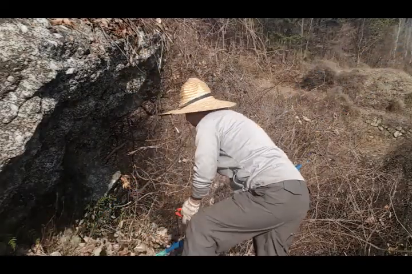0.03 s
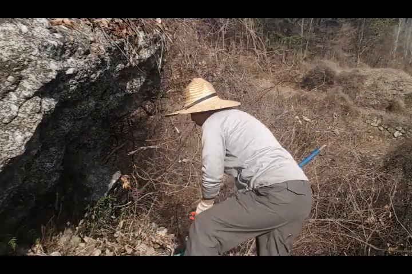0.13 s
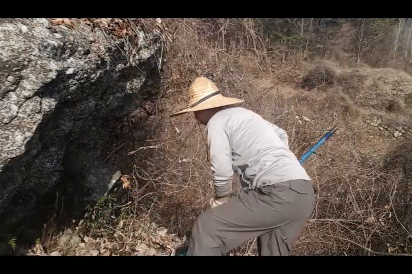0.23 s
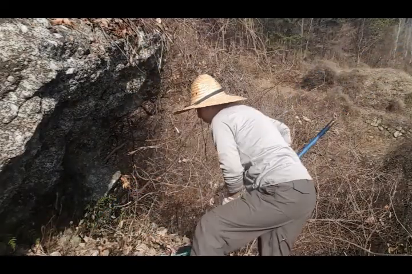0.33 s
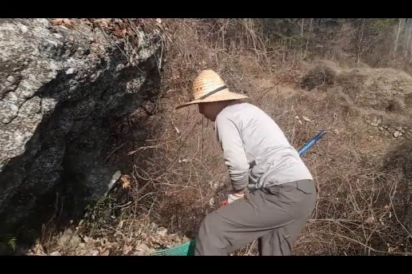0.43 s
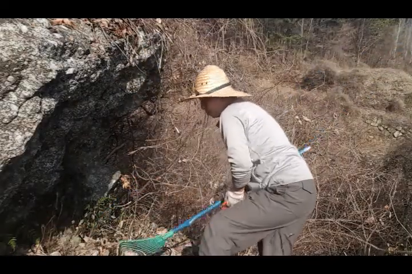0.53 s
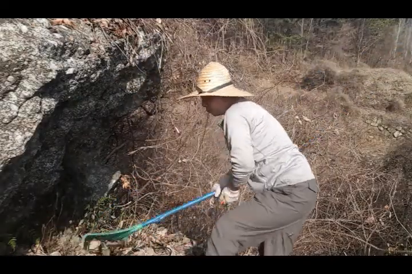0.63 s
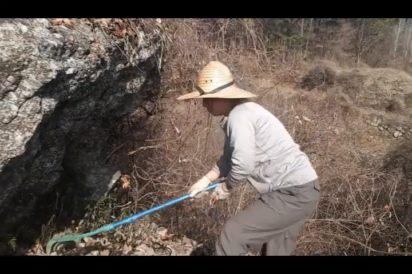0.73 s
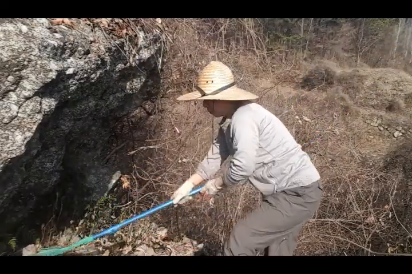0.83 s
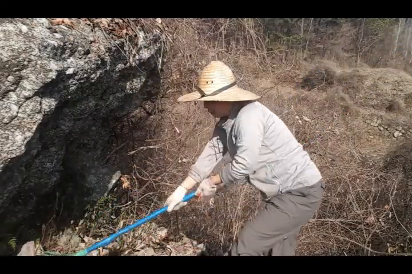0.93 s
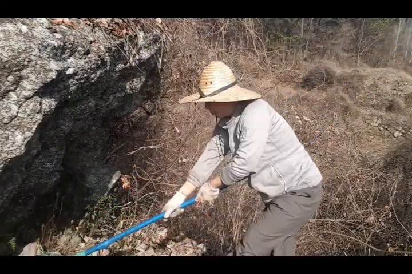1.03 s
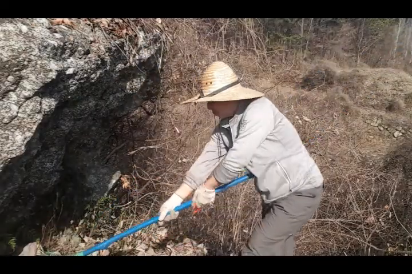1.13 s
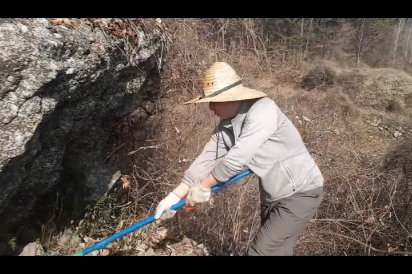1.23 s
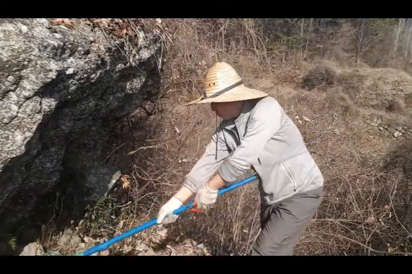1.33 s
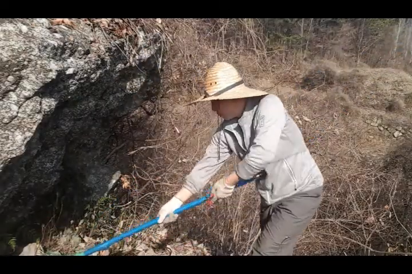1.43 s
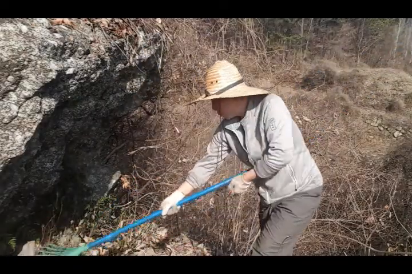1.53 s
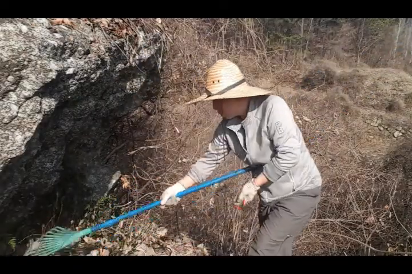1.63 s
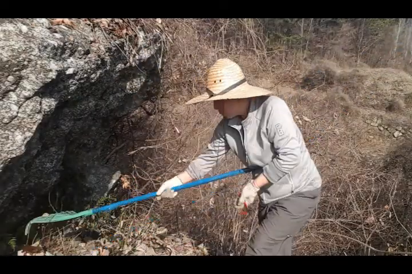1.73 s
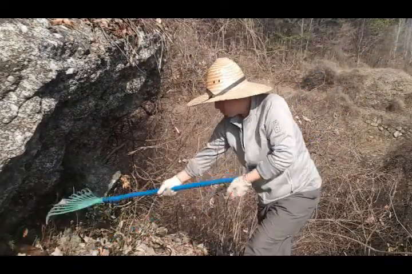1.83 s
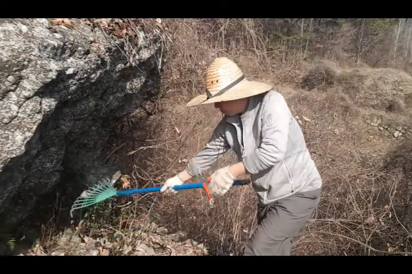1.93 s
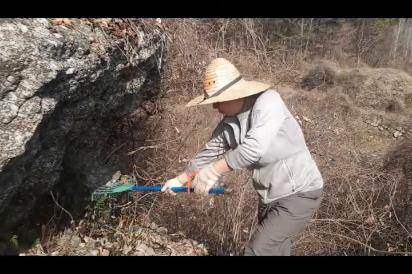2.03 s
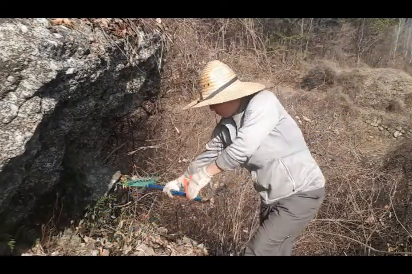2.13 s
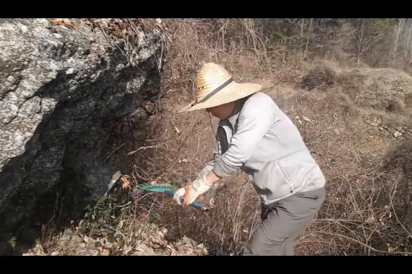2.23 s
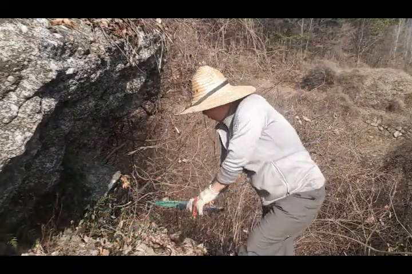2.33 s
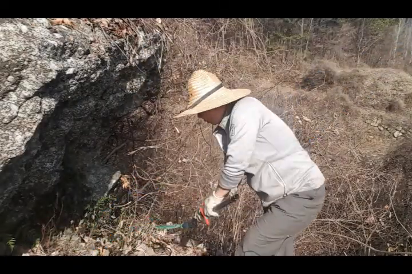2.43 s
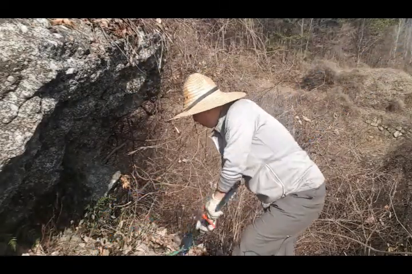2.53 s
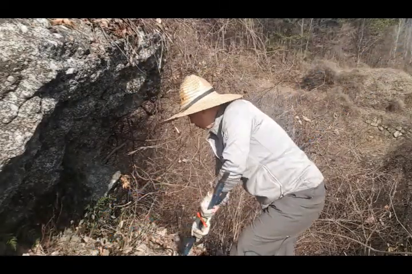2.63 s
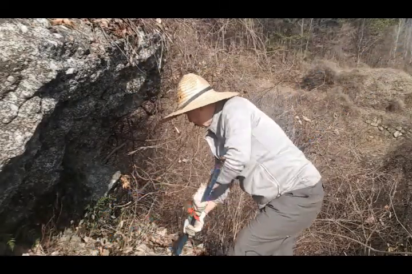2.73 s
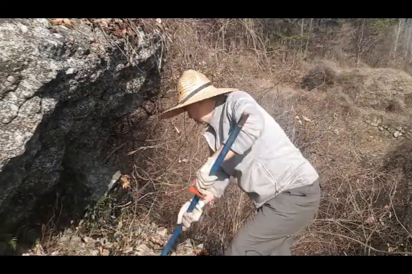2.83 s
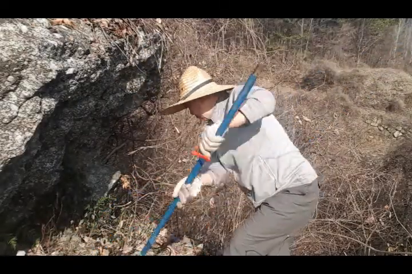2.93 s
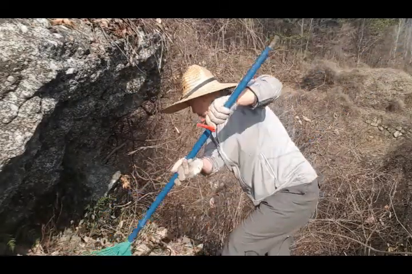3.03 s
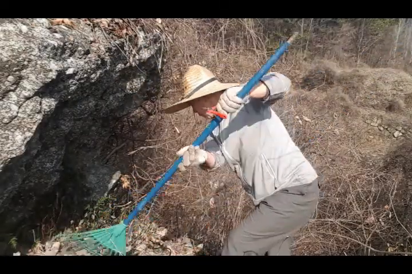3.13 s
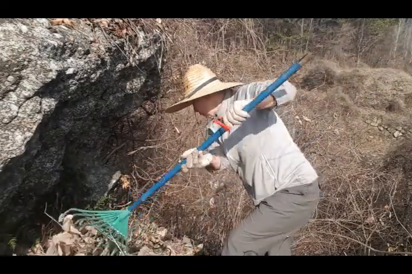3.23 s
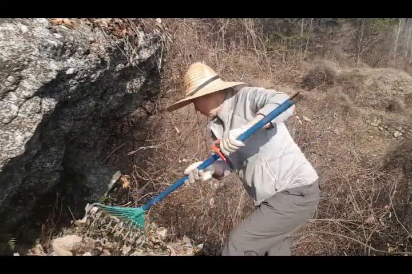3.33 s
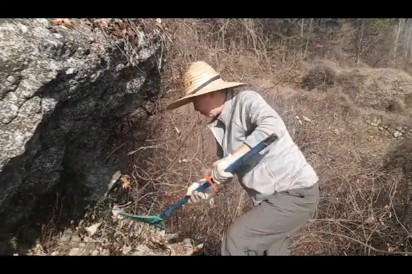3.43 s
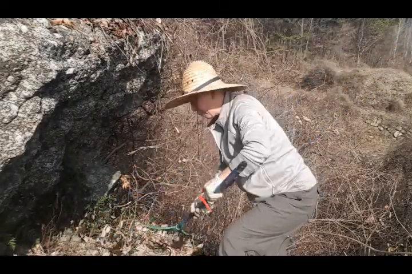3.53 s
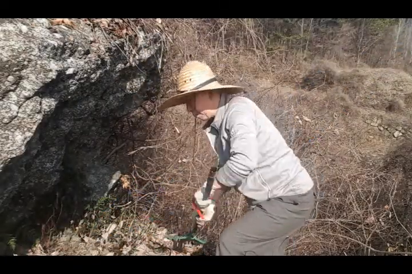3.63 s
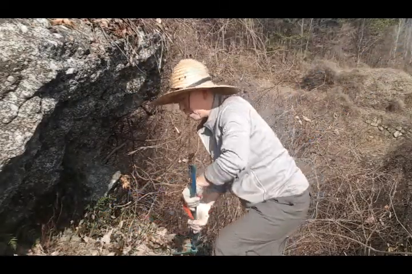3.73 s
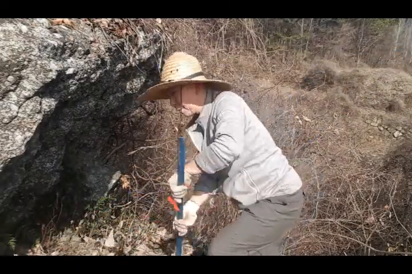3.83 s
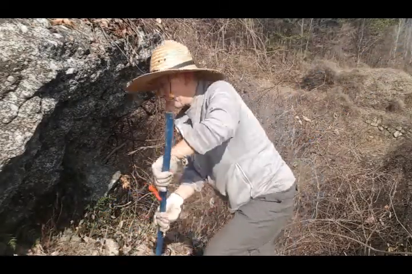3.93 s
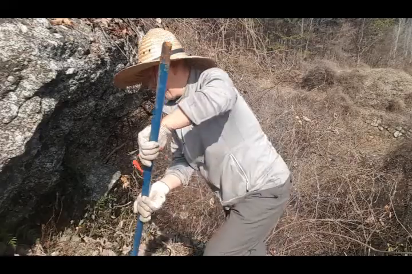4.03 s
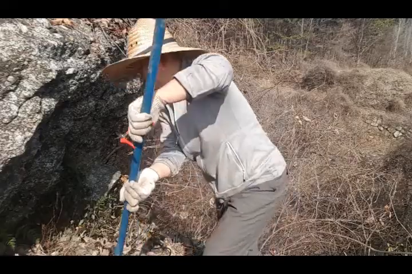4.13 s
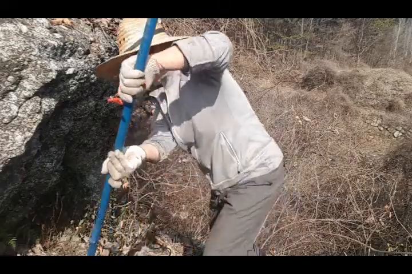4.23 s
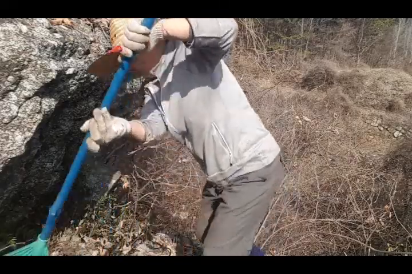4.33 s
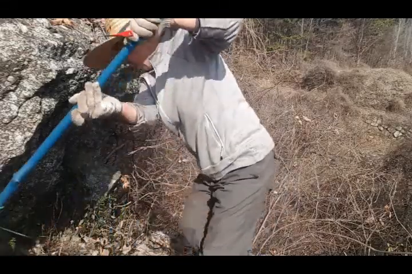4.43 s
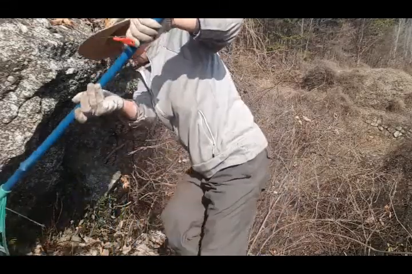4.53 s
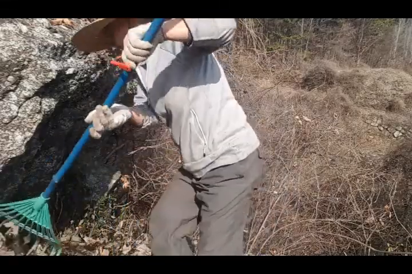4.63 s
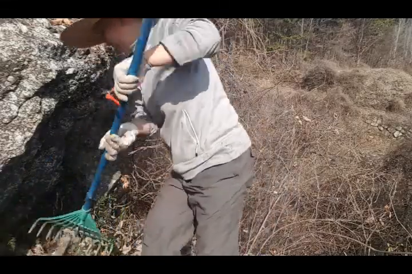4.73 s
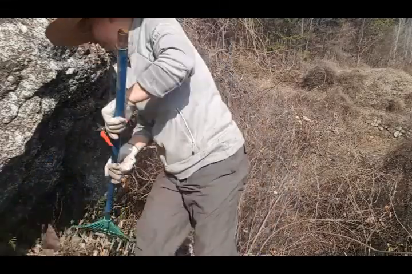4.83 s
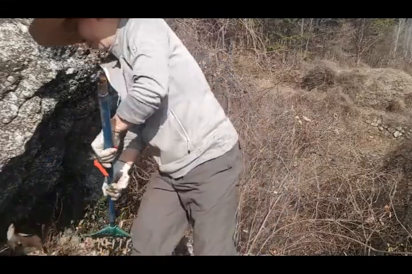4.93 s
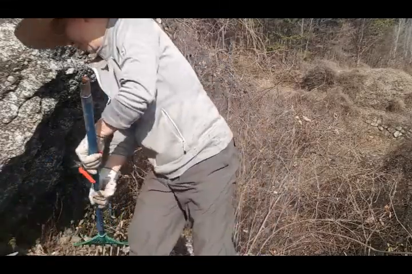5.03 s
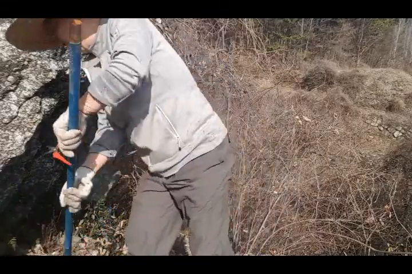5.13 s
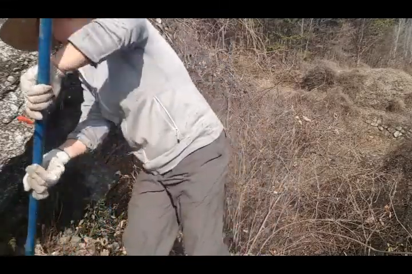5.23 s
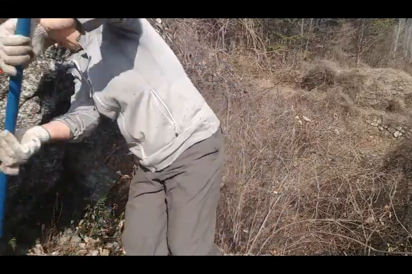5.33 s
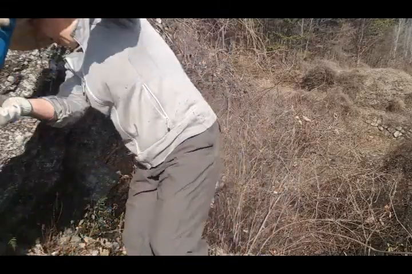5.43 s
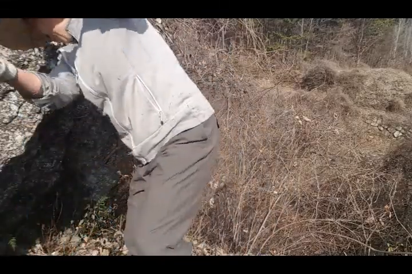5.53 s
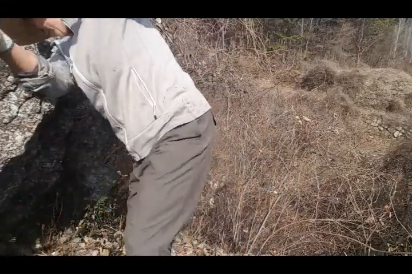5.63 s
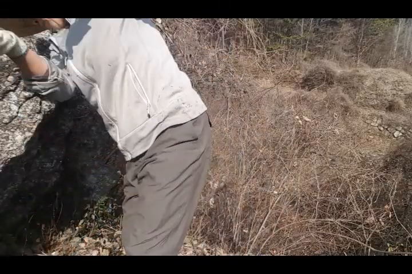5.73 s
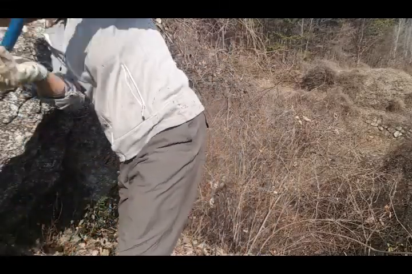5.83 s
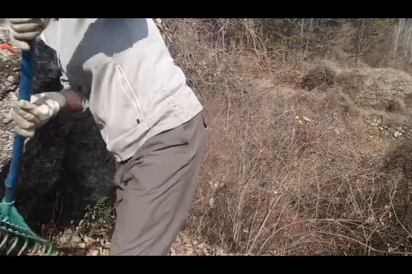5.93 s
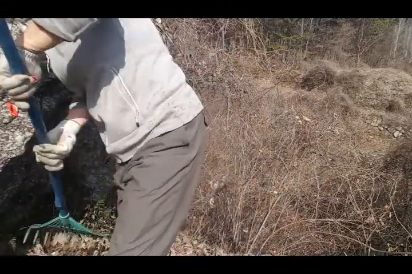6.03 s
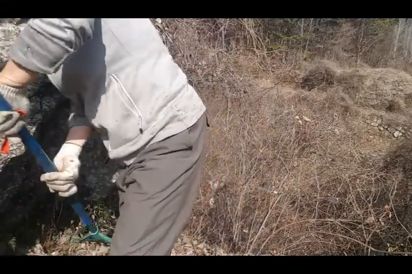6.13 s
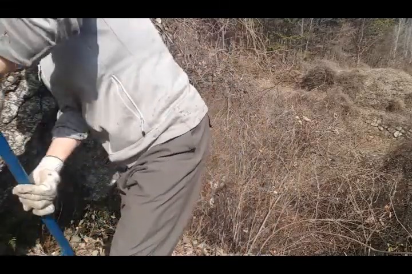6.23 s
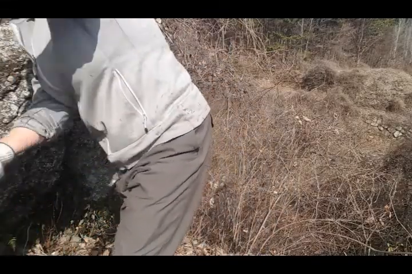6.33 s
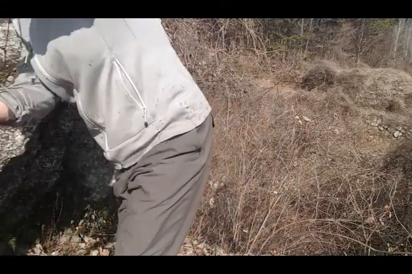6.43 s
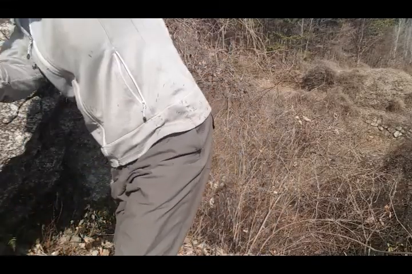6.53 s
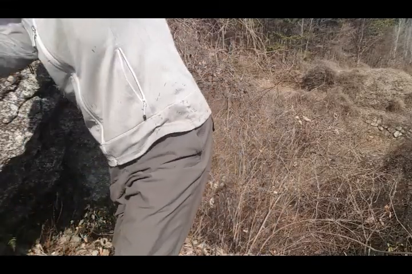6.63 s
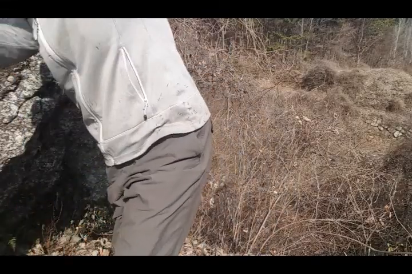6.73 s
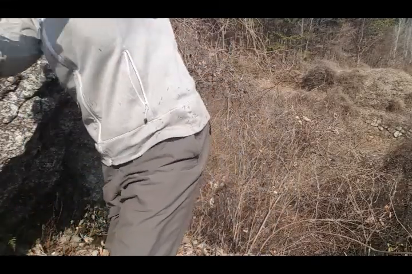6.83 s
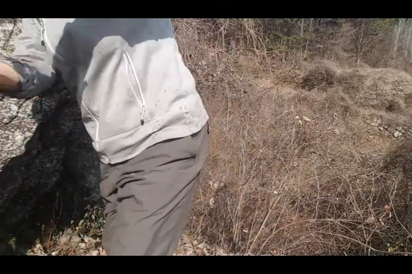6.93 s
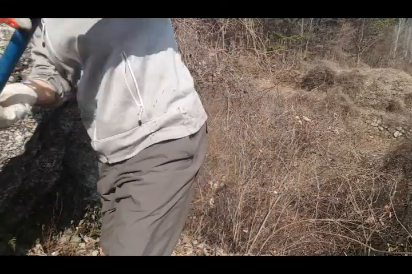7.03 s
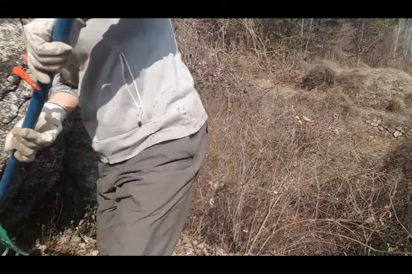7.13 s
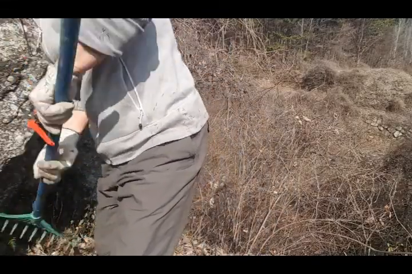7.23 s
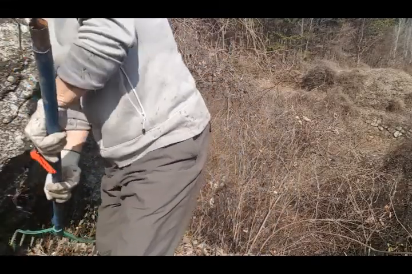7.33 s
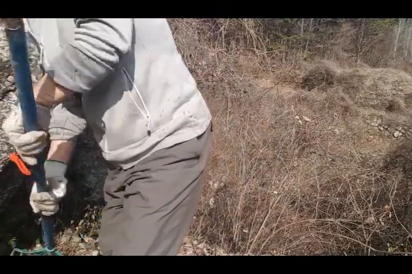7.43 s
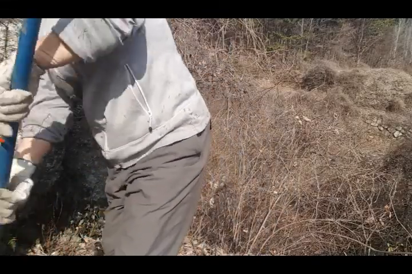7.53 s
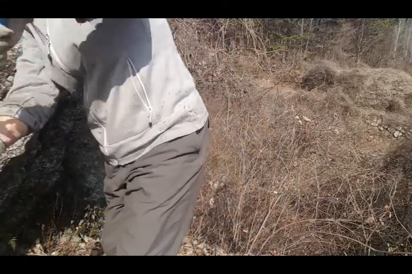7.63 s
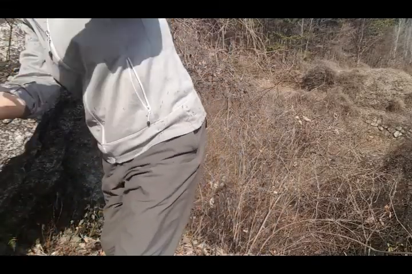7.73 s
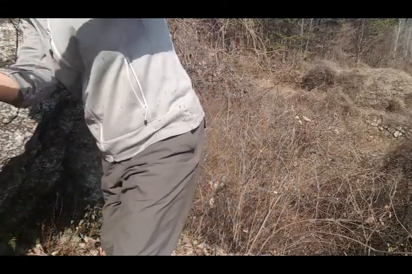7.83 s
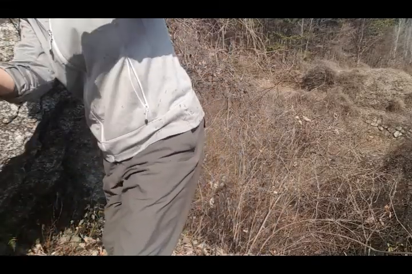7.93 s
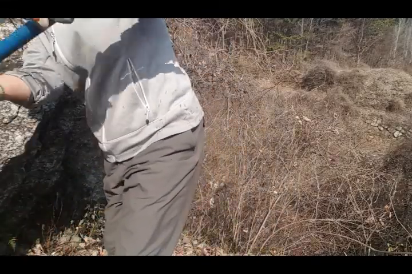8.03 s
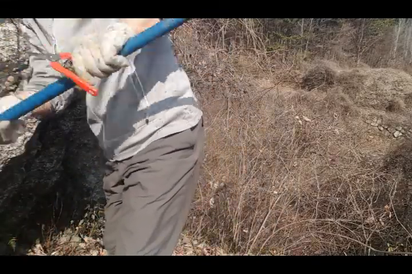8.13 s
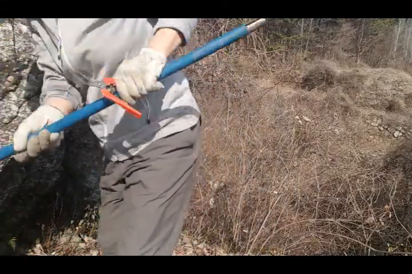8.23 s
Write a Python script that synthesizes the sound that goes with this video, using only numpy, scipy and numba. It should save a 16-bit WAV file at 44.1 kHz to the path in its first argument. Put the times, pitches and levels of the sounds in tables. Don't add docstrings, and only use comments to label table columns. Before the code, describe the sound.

Outdoors at the foot of a rock, a plastic rake pulls through dry leaves and brambles a couple of metres off, toward the right. Early strokes are light and irregular with small ticks; from about three seconds the pulls grow heavier, scraping soil, snapping twigs and knocking roots. One very sharp snap comes past five seconds. Brief near-quiet gaps show soft air. Close stereo microphone, dry, with slight rock scatter.

```python
import sys
import numpy as np
from scipy import signal
from scipy.fft import rfft, irfft
from scipy.io import wavfile
from scipy.ndimage import uniform_filter1d, map_coordinates
from numba import njit

SR = 44100
rng = np.random.default_rng(int(sys.argv[2]) if len(sys.argv) > 2 else 0)


def magnitude_from_level(level_db):
    exponent = np.asarray(level_db, float) / 20
    return 10 ** exponent


def transcribe(signal):
    frames = np.atleast_2d(signal).T
    limited = np.clip(frames, -1, 1)
    pcm = np.round(limited * 32767).astype(np.int16)
    wavfile.write(sys.argv[1], SR, pcm)


N = 365588

# frequency in Hz, density in dB per Hz.
AIR_SPECTRUM = [(18, 10), (35, -21), (60, 0), (130, 4), (400, -1.5), (1500, -2), (4000, -12.5), (9500, -32),
                (14000, -24)]
# frequency in Hz, gain in dB.
MIC_RESPONSE = [(25, -28), (60, -11.5), (150, -2.4), (450, -2.5), (630, -1.5), (930, -2), (1500, 1),
                (2800, 0), (4200, -3), (7500, -4.5), (9600, -7), (11500, -4.5), (14000, -0.5)]
# time in seconds, left minus right in the treble in dB, left lag in samples.
RAKE_PLACE = [(0, -6, 4.9), (.6, -4.5, 2.9), (1.1, -6, 10.5), (2, -6, 9.8), (2.6, -5, 2), (3.1, -7, 6.7),
              (3.7, -5, 4.7), (4.4, -6.5, 6.7), (4.9, -9.5, 12.2), (5.6, -8.5, 11.4), (6.2, -9.5, 16.9),
              (6.7, -10.5, 13), (7.2, -13, 17.3), (7.6, -8, 12.6), (8.29, -11, 16.5)]

# lowest pitch in Hz, highest pitch in Hz, ringing in cycles, grains per second,
# size scatter in dB, clumping in dB.
GROUND_GRAINS = (50, 151, 3.3, 130, 4.5, 1.1)
SOIL_GRAINS = (144.3, 896, 3.1, 900, 1.16, 0.27)
COMB_GRAINS = (559, 744, 11, 250, 0.94, 0.88)
TINE_GRAINS = (808, 4340, 3.5, 3500, 2.04, 1.1)
TWANG_GRAINS = (2230, 3510, 12.6, 500, 3.1, 3.1)
CRACKLE_GRAINS = (1190, 13800, 3.4, 250, 2.6, 1.2)
LEAF_GRAINS = (3900, 13360, 3.34, 9000, 0.39, 0.55)

# time in seconds, rumble in dB.
FOOTSTEPS = [(.39, -57), (.75, -62), (1.0, -58), (1.55, -66), (2.7, -64), (6.5, -55), (1.13, -55),
             (1.27, -61), (1.94, -72), (3.09, -47), (3.72, -63), (4.11, -52), (4.87, -54), (5.38, -47),
             (5.93, -54.5), (6.192, -70), (7.112, -67), (7.76, -57)]
# time in seconds, peak in dB, pitch in Hz, thump over knock in dB.
HEAD_THUDS = [(1.057, -45, 568, -16), (1.269, -46, 151, -9), (1.727, -41, 163, -21),
              (1.914, -39.5, 151, -20), (2.692, -40, 500, -22), (2.745, -30.5, 613, -25),
              (2.878, -32, 600, -30), (2.897, -27, 460, -34), (2.991, -36, 760, -31),
              (3.679, -35, 552, -23), (4.092, -41, 455, -29), (4.199, -28, 746, -14),
              (4.871, -29, 373, -19), (4.887, -31.5, 196, -1), (5.327, -44, 361, -12),
              (5.641, -34, 288, -27), (6.096, -37, 328, -39), (6.481, -22, 624, -22),
              (7.737, -27, 260, -19)]
# time in seconds, peak in dB, pitch in Hz.
STEM_TICKS = [(0.3877, -41, 1690), (0.851, -43, 2500), (0.984, -30, 4640), (0.997, -39, 3280),
              (1.1974, -44, 4900), (1.2624, -31.5, 1320), (1.3239, -40, 3590), (1.493, -43, 2300),
              (1.6384, -34, 3930), (1.675, -43, 3030), (2.0602, -37, 4510), (2.1016, -42, 4500),
              (2.56, -46, 2600), (2.692, -35.5, 2230), (2.8709, -34, 2920), (4.0462, -53, 3260),
              (5.114, -35, 3870), (5.2986, -41, 1785), (6.4106, -36, 5550), (6.5584, -38, 3640),
              (6.762, -23, 3030), (7.2606, -29, 2680), (7.499, -33, 2330), (7.661, -39.5, 3100),
              (7.7228, -34, 3800)]
# time in seconds, peak in dB, pitch in Hz, crack over body in dB.
TWIG_SNAPS = [(0.432, -32, 2150, -19), (1.06, -24.5, 3530, -14), (1.0999, -33, 3050, -7),
              (1.7215, -27, 4150, -28), (1.8484, -32, 3660, -12), (1.919, -28, 2800, -18),
              (2.739, -38, 2280, -4), (2.7457, -30, 1640, -24), (2.8963, -28, 2770, -23),
              (2.9122, -24, 2780, -24), (3.2114, -23, 1810, -21), (3.676, -31, 2290, -22),
              (4.052, -31, 2690, -19), (4.101, -32, 1570, -24), (4.204, -23, 3230, -19),
              (4.2326, -19, 1800, -26), (4.2804, -14.5, 1580, -9), (4.2852, -20, 1900, -11),
              (4.4607, -26, 1730, -10), (5.3238, -38, 1470, -14), (5.3411, -8, 2060, -19),
              (5.3504, -31, 1480, -16), (6.0204, -29, 2570, -14), (6.153, -31, 2410, -14),
              (6.2622, -37, 2460, -17), (6.4413, -24, 1280, -12.5), (6.4656, -22.5, 1250, -8.5),
              (6.7181, -19, 2370, -10.5), (7.741, -22, 3300, -35), (7.891, -26, 2820, -18)]
# start in seconds, rise in seconds, hold in seconds,
# leaves in dB, dig into soil in dB.
RAKE_SWINGS = [(0.551, 0.12, 0.09, -52.5, -3), (0.806, 0.097, 0.22, -53.5, -3),
               (1.213, 0.04, 0.02, -57, -5), (1.35, 0.022, 0.065, -61, -4), (2, 0.073, 0.1, -65.5, -17),
               (2.768, .02, .08, -59.5, 1.5), (3.31, 0.037, 0.14, -52, -3),
               (3.489, 0.079, 0.14, -51.5, -1.5), (4.95, .04, 0.09, -55.5, -0.5),
               (5.14, .02, 0.037, -63.5, 0), (6.19, 0.043, 0.11, -52.5, -5), (7.402, .05, 0.16, -60.5, 3)]
# start in seconds, rise in seconds, hold in seconds,
# leaves in dB, dig into soil in dB.
RAKE_PULLS = [(-.05, .16, 0.15, -38.5, -11), (0.294, 0.054, 0.085, -46.5, -1.5),
              (1.043, 0.011, 0.038, -46, -8.5), (1.658, .08, 0.011, -52.5, -7),
              (1.766, 0.08, 0.046, -49, -14), (2.86, .02, 0.023, -53, 3.5), (2.905, .15, 0.16, -39, -2),
              (4.031, 0.028, 0.1, -49.5, 1), (4.14, 0.081, 0.38, -39, -0.5),
              (4.674, 0.024, 0.22, -46.5, -4), (5.295, 0.051, 0.17, -41, -0.5),
              (5.475, 0.14, 0.13, -34, -2), (5.962, 0.13, 0.11, -46.5, -2), (6.448, 0.082, .31, -36.5, -2),
              (6.952, 0.1, .21, -43.5, -5.5), (7.708, .06, 0.017, -33.5, -3),
              (7.816, 0.053, 0.22, -39, -4.5)]
# time in seconds, leaves in dB, dig into soil in dB, stems plucked in dB.
TINE_JERKS = [(0.492, -53, -13, 2), (.918, -46.5, -14, -22), (0.992, -45.5, -12, -11),
              (1.121, -40, -15, -5.5), (1.146, -48.5, -8, -6), (1.325, -54.5, -6, -3),
              (1.495, -68, -6, -10), (1.646, -60, -15, -6), (2.11, -55, -15, -8), (2.151, -56, -20, -6),
              (2.562, -60.5, 3.5, 0.5), (2.698, -49.5, -17, -18), (2.735, -47, -12, -13),
              (2.746, -40.5, -7, -4), (2.875, -53.5, 3, 0), (2.915, -59, 1, 12), (3.0, -43.5, 5, -6),
              (3.088, -36, -4, -13), (3.215, -35, -13, -25), (3.934, -63, -3, -39), (4.107, -52, 15, 8),
              (4.213, -45, 2, 7), (4.281, -39.5, -20, 4), (4.721, -50, -13, 0), (4.872, -47.5, 14, 2),
              (5.128, -46.5, -16, -14), (5.346, -41.5, -14, 10), (5.593, -48, -12, -4),
              (6.72, -33.5, -16, -4), (7.046, -54, -20, -16.5)]

WIDTH_SAMPLES, WIDTH_DB, SHADOW_HZ = 2.4, 4.5, 2600
ROCK_S, ROCK_DB, ROCK_HZ = .006, -2, 1570
PATCH_DB, PATCH_S = 2.13, .04

AIR_DB = -63.5
GROUND_DB, SOIL_DB, COMB_DB, TINES_DB, LEAVES_DB, CRACKLE_DB = 3, 0, -7.5, -1.5, 3.5, -10
TWANG_DB, TWANG_DB_PER_LAG = -20.5, 0.6133
THUD_DB, THUMP_DB, HEAD_T60_S = 2, 10, .05
SNAP_DB, CRACK_DB, TICK_CRACK_DB, TWIG_T60_S = -8.5, 15.5, -11.5, .012

START_DB, LIFT_DB_PER_S = -18, 103
SURFACE_DB_PER_S = 14.5
SETTLE_DB, SETTLE_DB_PER_S, REST_DB = -20, 24, -72.5
SETTLE_PER_PAN, SWING_SETTLE_DB = -1.105, -30
STEMS_PER_DIG, STEMS_DB_PER_LAG = .3, 0.2508
JERK_UP_DB_PER_S, JERK_DOWN_DB_PER_S, JERK_SETTLE_DB = 1200, 572, -24
STEP_UP_DB_PER_S, STEP_DOWN_DB_PER_S, SHAKE_DB = 134, 112, -15


def level(x, db):
    return x * magnitude_from_level(db) / np.sqrt(np.mean(x ** 2))


def colour(x, points):
    hz, db = np.transpose(points)
    gain_db = np.interp(np.log(np.fft.rfftfreq(4096, 1 / SR) + 1), np.log(hz), db)
    cepstrum = irfft(gain_db * np.log(10) / 20)
    cepstrum[1:2048] *= 2
    cepstrum[2049:] = 0
    impulse = irfft(np.exp(rfft(cepstrum)))
    return signal.fftconvolve(x, impulse[None], axes=1)[:, :N]


def walk(rate):
    held = int(SR / rate)
    steps = np.repeat(rng.standard_normal(N // held + 1), held)
    return 1.2 * uniform_filter1d(steps, held)[:N]


def air():
    mid, side = rng.standard_normal((2, N))
    swell = magnitude_from_level(walk(3))
    pair = np.array([mid + 0.62 * side, mid - 1.05 * side])
    return level(colour(pair, AIR_SPECTRUM), AIR_DB) * swell


@njit
def ring(start, hz, t60, size, count):
    out = np.zeros(count)
    for k in range(len(start)):
        rate = 2j * np.pi * hz[k] / SR - np.log(1000) / (t60[k] * SR)
        first = int(start[k]) + 1
        last = min(count, first + int(.65 * t60[k] * SR) + 2)
        z, turn = size[k] * np.exp(rate * (first - start[k])), np.exp(rate)
        for i in range(first, last):
            out[i] += z.imag
            z *= turn
    return out


def heard(s, hz, t60, size, lag, side_db):
    place_s, pan_db, _ = np.transpose(RAKE_PLACE)
    shade = magnitude_from_level((np.interp(s, place_s, pan_db) + side_db) * hz / (hz + SHADOW_HZ) / 2)
    late = -ROCK_S * SR * np.log(rng.random((len(s), 2)).T + 1e-4)
    echo = size * magnitude_from_level(ROCK_DB) * hz / (hz + ROCK_HZ)
    left = (np.maximum(s * SR + lag, 0), shade, late[0])
    right = (s * SR, 1 / shade, late[1])
    pitches, decays = np.r_[hz, hz], np.r_[t60, t60]
    return np.array([ring(np.r_[at, at + wait], pitches, decays, np.r_[size * gain, echo * gain], N)
                     for at, gain, wait in (left, right)])


def splinter(s, db, hz, t60, spread, cycles, count):
    chance = rng.random((len(s), 3, count))
    lag = np.interp(s, *np.transpose(RAKE_PLACE)[::2])
    late = chance[:, 0] ** 1.7 * np.abs(t60)[:, None]
    pitch = np.clip(hz[:, None] * spread ** (4 * chance[:, 1] - 2), 40, 16000).ravel()
    size = magnitude_from_level(db[:, None] - 28.0 * chance[:, 0] ** 1.47) * (2 * chance[:, 2] - 1)
    when = (s[:, None] + late).ravel()
    return heard(when, pitch, cycles / pitch, size.ravel(), np.repeat(lag, count), 0)


def head():
    s, db, hz, thump_db = np.transpose(HEAD_THUDS)
    t60 = np.full(len(s), HEAD_T60_S)
    knock = splinter(s, db + THUD_DB, hz, t60, spread=1.195, cycles=6.6, count=12)
    thump_hz = np.full(len(s), 80.0)
    thump = splinter(s, db + thump_db + THUMP_DB, thump_hz, t60, spread=0.55, cycles=7.4, count=4)
    return knock + thump


def twigs():
    ticks = [tuple(tick) + (TICK_CRACK_DB,) for tick in STEM_TICKS]
    s, db, hz, crack_db = np.transpose(list(TWIG_SNAPS) + ticks)
    t60 = np.full(len(s), TWIG_T60_S)
    body = splinter(s, db + SNAP_DB, hz, t60, spread=0.94, cycles=10.5, count=50)
    crack_hz = np.full(len(s), 9500.0)
    crack = splinter(s, db + crack_db + CRACK_DB, crack_hz, 0.49 * t60, spread=1.48, cycles=8.2, count=50)
    return body + crack


def together(db):
    return 10 * np.log10(np.sum(magnitude_from_level(db) ** 2, axis=0))


def peak(t, s, db, up, down):
    return db - np.maximum(up * (s - t), down * (t - s))


def effort():
    t = np.linspace(0, N / SR, 4200)
    place_s, pan_db, lag = np.transpose(RAKE_PLACE)

    strokes = list(RAKE_PULLS) + list(RAKE_SWINGS)
    start, rise, hold, db, dig = np.transpose(strokes)[:, :, None]
    swell = START_DB * np.clip(1 - (t - start) / rise, 0, None) ** 2
    lifted = np.clip(t - start - rise - hold, 0, None)
    pull = db + swell - LIFT_DB_PER_S * lifted
    depth = dig - SURFACE_DB_PER_S * np.clip(t - start, 0, rise + hold)

    heap = SETTLE_DB + SETTLE_PER_PAN * np.interp(start, place_s, pan_db)
    heap[len(RAKE_PULLS):] += SWING_SETTLE_DB
    settle = db + swell + heap - SETTLE_DB_PER_S * lifted

    s, jerk_db, jerk_dig, pluck = np.transpose(TINE_JERKS)[:, :, None]
    jerk = peak(t, s, jerk_db, JERK_UP_DB_PER_S, JERK_DOWN_DB_PER_S)
    after = peak(t, s, jerk_db + JERK_SETTLE_DB, JERK_UP_DB_PER_S, 2 * SETTLE_DB_PER_S)
    loose = together(np.vstack([settle, after, REST_DB + 0 * t]))

    stems = STEMS_DB_PER_LAG * np.interp(t, place_s, lag)
    leaves = together(np.vstack([pull, jerk, loose]))
    tines = together(np.vstack([pull + STEMS_PER_DIG * depth + stems, jerk + pluck + 5.0, loose + 0.53 * stems]))
    soil = together(np.vstack([pull + depth, jerk + jerk_dig, loose - 2.5]))
    steps = peak(t, *np.transpose(FOOTSTEPS)[:, :, None], STEP_UP_DB_PER_S, STEP_DOWN_DB_PER_S)
    ground = together(np.vstack([steps, soil + SHAKE_DB]))
    return leaves, tines, soil, ground


def rustle(kind, curve_db, clumps, count):
    lo_hz, hi_hz, cycles, _, scatter_db, clump_db = kind
    when, pitch, luck = rng.random((3, count))
    across, side, damp = rng.standard_normal((3, count))
    s = when * (N - 1) / SR
    hz = lo_hz + (hi_hz - lo_hz) * pitch
    t60 = np.log(1000) / 2 * cycles * magnitude_from_level(2.2 * damp) / hz

    sizes = rng.standard_normal((24, 400))
    patch_db = PATCH_DB * map_coordinates(sizes, [6 * np.log(hz / lo_hz), s / PATCH_S], order=1)
    luck_db = -scatter_db * np.log(luck + 1e-3)
    size = magnitude_from_level(patch_db + luck_db + clump_db * clumps[(s * SR).astype(int)]) / np.sqrt(t60)
    size = size * np.sign(rng.random(count) - .5)
    size = size / np.sqrt(np.mean(size ** 2 * t60) * count / N * SR / 4 / np.log(1000))
    curve = np.interp(s, np.linspace(0, N / SR, len(curve_db)), curve_db)

    lag = np.interp(s, *np.transpose(RAKE_PLACE)[::2]) + WIDTH_SAMPLES * across
    return heard(s, hz, t60, size * magnitude_from_level(curve), lag, WIDTH_DB * side)


def rake():
    catch = 0.082 * walk(24) + 0.41 * walk(55)
    leaves, tines, soil, ground = effort()
    lag = np.interp(np.linspace(0, N / SR, len(leaves)), *np.transpose(RAKE_PLACE)[::2])
    layers = [(GROUND_GRAINS, ground + GROUND_DB),
              (SOIL_GRAINS, soil + SOIL_DB),
              (COMB_GRAINS, soil + COMB_DB),
              (TINE_GRAINS, tines + TINES_DB),
              (TWANG_GRAINS, tines + TWANG_DB + TWANG_DB_PER_LAG * lag),
              (CRACKLE_GRAINS, leaves + CRACKLE_DB),
              (LEAF_GRAINS, leaves + LEAVES_DB)]
    return sum(rustle(kind, db, catch + 0.83 * walk(30), count=round(kind[3] / 125) * 1000)
               for kind, db in layers)


def scene():
    return air() + colour(head() + twigs() + rake(), MIC_RESPONSE)


def top_cut(x):
    return signal.sosfilt(signal.butter(12, 15670, fs=SR, output="sos"), x)


def record(dry):
    low_pass = signal.ellip(10, .3, 70, 14680, fs=SR, output="sos")
    cut = signal.sosfilt(low_pass, dry)
    offset = -.0006
    return top_cut(cut + offset)


dry = scene()
out = record(dry)
transcribe(out)
```